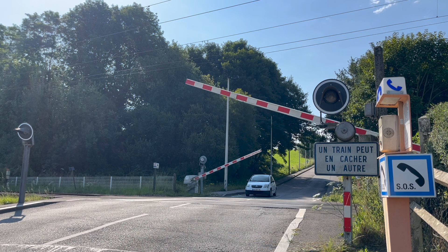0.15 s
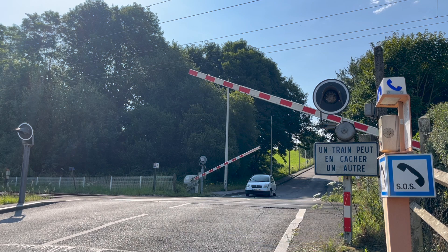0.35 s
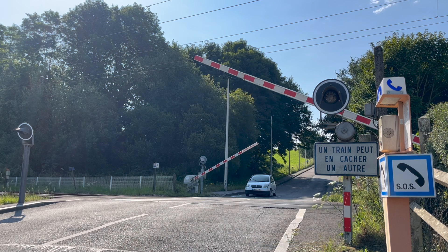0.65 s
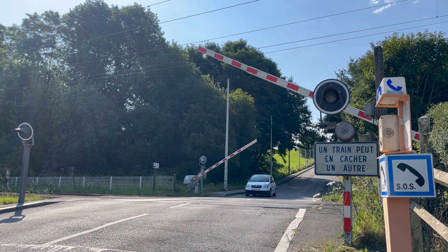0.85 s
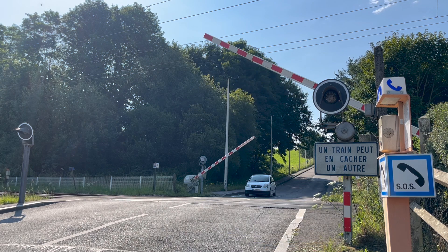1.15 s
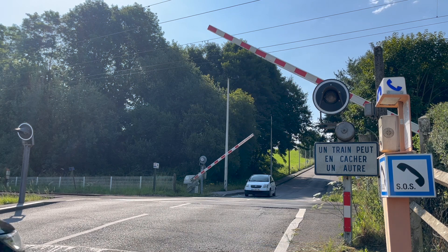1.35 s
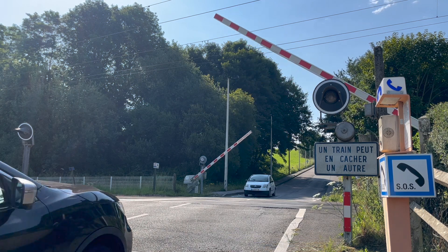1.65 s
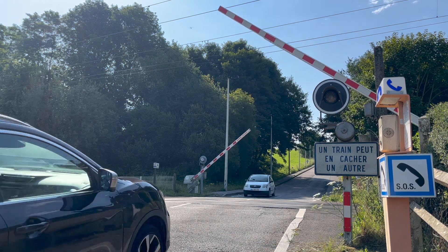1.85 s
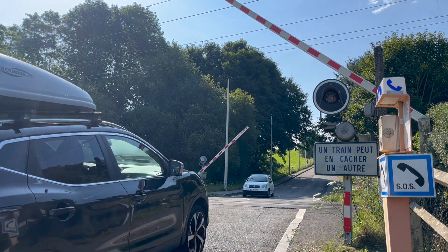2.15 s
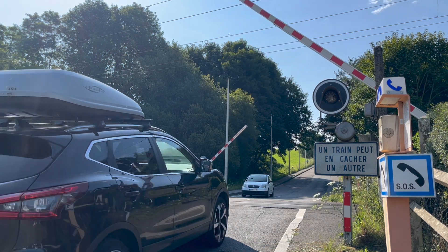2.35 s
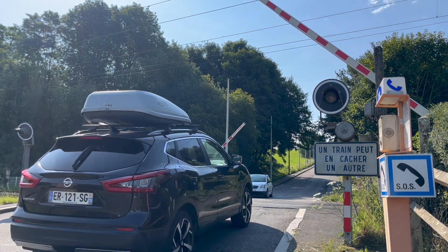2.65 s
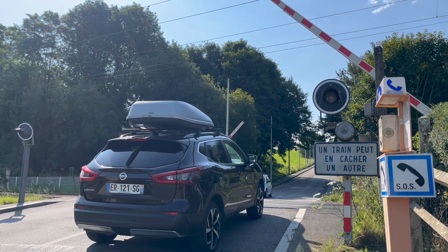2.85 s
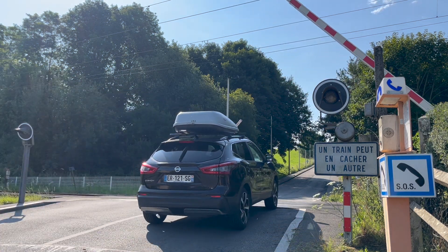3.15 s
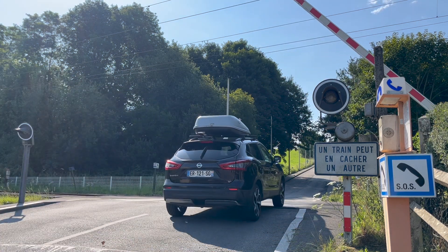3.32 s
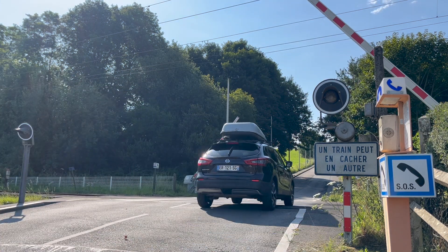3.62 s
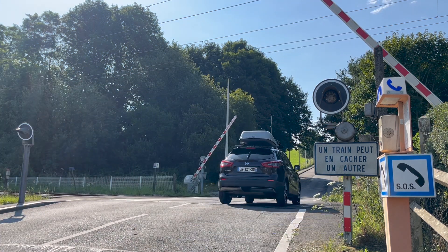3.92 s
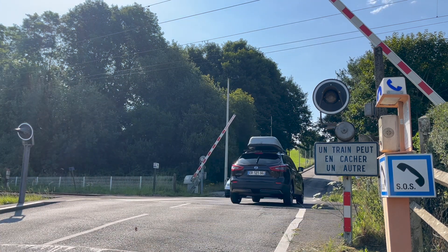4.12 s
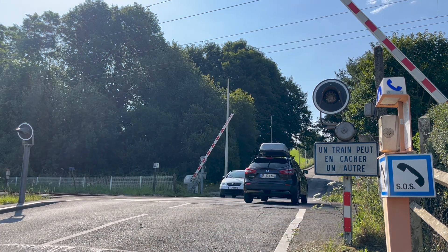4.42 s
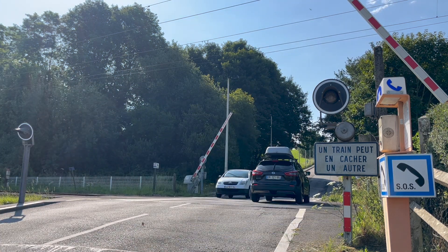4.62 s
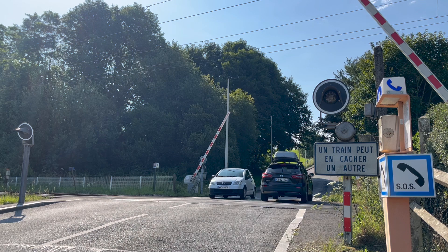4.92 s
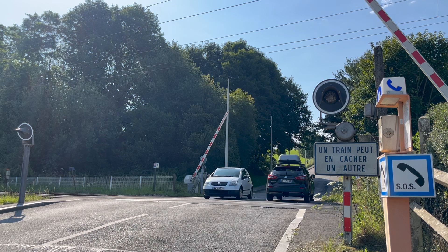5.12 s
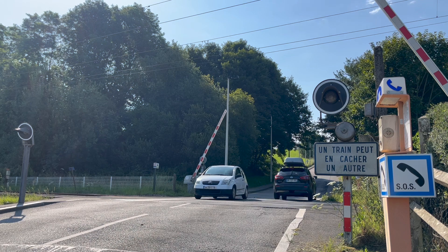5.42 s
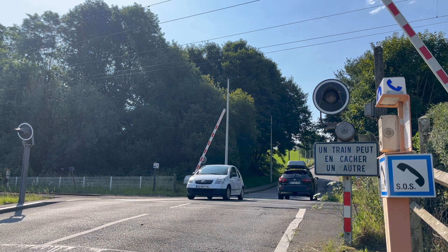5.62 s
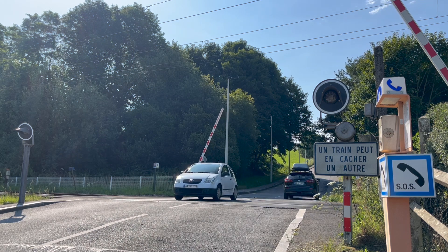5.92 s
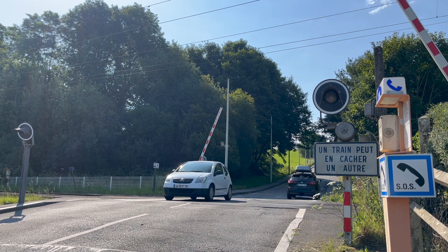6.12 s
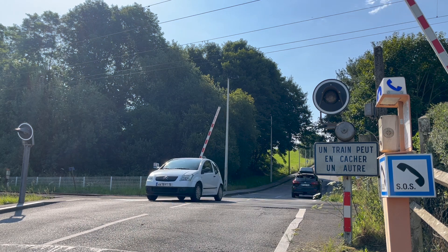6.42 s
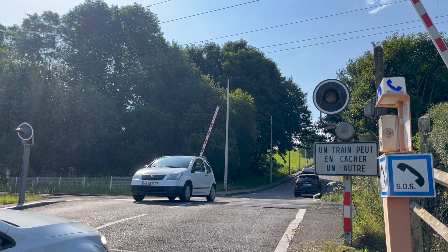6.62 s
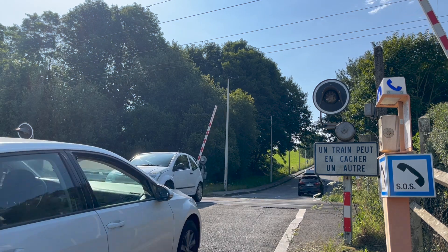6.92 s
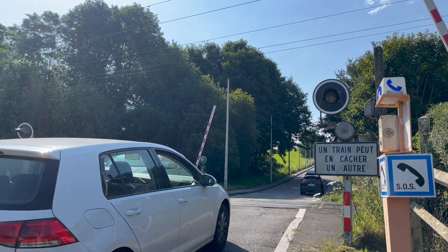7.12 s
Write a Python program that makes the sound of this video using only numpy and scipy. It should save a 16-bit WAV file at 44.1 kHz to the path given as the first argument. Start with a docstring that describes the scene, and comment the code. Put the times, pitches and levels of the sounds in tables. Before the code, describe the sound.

Heard in stereo from the roadside: a low, throbbing engine gathers speed, raspy under load, then eases off as the car crosses the rails with dull bumps and short clacks. More thuds follow while a weak oncoming drone lingers. A second car swells from the left, smoother in engine but fuller in tyre noise, its close passage shaking with strong bass thumps and rattling knocks. Faint leaves and distant traffic lie underneath.

```python
"""A car pulls away on the left from a crawl, passes close by on its exhaust hum and thumps over crossing rails.
A second car rolls up from the left while an oncoming one drones nearer; loose panels knock, grit snaps.
Exhausts are tones locked to the firings; engine bays, tyres and rumble are coloured noise; thuds are swings.
Heard from the verge of a country level crossing through a small pair of microphones."""
import sys
import numpy as np
from scipy import signal
from scipy.fft import rfft, irfft, next_fast_len
from scipy.io import wavfile
from scipy.ndimage import map_coordinates

SR = 44100
rng = np.random.default_rng(int(sys.argv[2]) if len(sys.argv) > 2 else 0)


def bounce(signal):
    """Save signal as a 16-bit WAV file at the path given by the first command-line argument."""
    frames = np.transpose(np.atleast_2d(signal))
    limited = np.clip(frames, -1, 1)
    pcm = np.round(limited * 32767).astype(np.int16)
    wavfile.write(sys.argv[1], SR, pcm)


N = 320166


def from_db(db):
    """Amplitude for a level in dB."""
    return np.exp(np.asarray(db) * (np.log(10) / 20))


def rms_one(x):
    """Scales x to rms 1."""
    return x / np.sqrt(np.mean(x ** 2) + 1e-20)


def seconds():
    """The time of every sample."""
    return np.arange(N) / SR


def in_time(rows):
    """The columns of a curve at every sample."""
    s, *columns = np.transpose(rows)
    return [np.interp(seconds(), s, c) for c in columns]


def within(rows, fade_s=0.24):
    """One while a curve lasts, fading out beyond its ends."""
    first_s, last_s = rows[0][0], rows[-1][0]
    return np.interp(seconds(), [first_s - fade_s, first_s, last_s, last_s + fade_s], [0, 1, 1, 0])


def at_hz(points, hz):
    """The columns of a spectrum at the given frequencies."""
    f, *columns = np.transpose(points)
    return [np.interp(np.log(hz + 1e-3), np.log(f), c) for c in columns]


def coloured(x, spectrum):
    """Gives x the spectrum, with rms 1."""
    size = next_fast_len(N)
    level_db, = at_hz(spectrum, np.arange(size // 2 + 1) * SR / size)
    return rms_one(irfft(rfft(x, size) * from_db(level_db), size)[:N])


def butter(x, hz, kind, order=2):
    """Butterworth filter."""
    return signal.sosfilt(signal.butter(order, hz, kind, fs=SR, output="sos"), x)


def drift(rate):
    """A smooth random wander of rms 1, with two random points for each cycle of the rate (Hz)."""
    knots = rng.standard_normal(int(N / SR * 400) + 4)
    places = np.arange(0, N, 32) / SR * min(2 * rate, 400)
    wander = rms_one(map_coordinates(knots, [places], order=2, mode="mirror"))
    return wander.repeat(32)[:N]


def bell(x, centre, width):
    """One at the centre, falling away on both sides."""
    return np.exp(-((x - centre) / width) ** 2)


def resonance(noises, hz, width_hz):
    """Two noises sound through a band whose centre may glide; rms 1."""
    angle = 2 * np.pi * np.cumsum(hz + np.zeros(N)) / SR
    return rms_one(np.sum(butter(noises, width_hz / 2, "low") * [np.cos(angle), np.sin(angle)], axis=0))


def add(track, s, sound):
    """Mixes a short sound in at time s."""
    start = max(int(s * SR), 0)
    track[start:start + len(sound)] += sound[:N - start]


def drive(abreast_s, lane_m, speed, accel, top_speed):
    """A car gathers speed (m/s, m/s2): metres past the listener, metres to the side, speed against abreast."""
    now = np.clip(speed + accel * (seconds() - abreast_s), .5, top_speed)
    start_m = -speed * abreast_s + accel * abreast_s ** 2 / 2
    return start_m + np.cumsum(now) / SR, lane_m, now / speed


def spreading_db(along_m, lane_m):
    """Loss with distance, against the closest point."""
    return -20 * np.log10(np.hypot(along_m, lane_m) / lane_m)


def ahead(path):
    """Minus one far before the listener, zero abreast, one far beyond."""
    along_m, lane_m, _ = path
    return along_m / np.hypot(along_m, lane_m)


def bearing_of(path):
    """How far left of the microphones' aim a car is (rad)."""
    along_m, lane_m, _ = path
    aim_rad = 0.374   # left of the road ahead
    rear_rad = 1.643   # beyond this bearing the pair hears no further change
    return np.minimum(np.arctan2(lane_m, along_m) - aim_rad, rear_rad)


def scattered(hz, frames):
    """A short diffuse tail, unrelated left and right, its share set for each frequency."""
    # tail against the direct sound: f/Hz, level/dB
    tail_share = [(40, -10), (130, -22.5), (280, -10), (550, -6), (1200, -3.5), (1600, 0.5), (1950, -8),
                  (2800, -6), (4500, -6), (7000, 6.5), (8300, -60), (10000, 30), (11300, -23), (12500, -11),
                  (13600, -19)]
    t60_s = 0.13
    keep = from_db(-120 * 256 / SR / t60_s)   # power kept from one frame to the next
    tail = np.sqrt(signal.lfilter([1 - keep], [1, -keep], np.abs(frames) ** 2))
    wet = from_db(at_hz(tail_share, hz)[0])[:, None]
    random_phase = np.exp(2j * np.pi * rng.random((2, *frames.shape)))
    return wet, np.sqrt(2) * wet * tail * random_phase


def microphones(x, bearing, treble_db=0):
    """Left and right differ in phase and level: by bearing in bass and middle, by set phases in the treble."""
    # left against right: f/Hz, phase lead for each rad of bearing, set phase lead/rad,
    # level/dB straight ahead, level/dB for a source on the left
    pair = [(20, 0, 0, 0, 0), (110, .12, .04, .5, .3), (250, .38, .15, 1.5, .8), (500, 1.0, .05, 1, 1.5),
            (800, 1.35, .15, 0, 3.5), (1100, 1.55, .1, -.5, 2.5), (1400, 1.9, .15, 0, -1),
            (1650, 2.0, -.3, 1, -1), (1850, .5, .1, 0, .8), (2500, .3, .45, .5, 3), (3500, .7, .6, 3, 4.5),
            (4600, .3, .7, 5, 4.5), (5600, 0, -.75, 1.5, 4), (6400, .3, -1.25, 0, 4),
            (7200, .3, -2.2, 0, 1), (7900, 0, -3, 0, 0), (9000, 0, -3.3, 0, 0), (10000, 0, -4.7, 0, 0),
            (11000, 0, -6.2, 0, 0), (12800, 0, -6.35, 0, 0), (13500, 0, -7.2, 0, 0), (14400, 0, -9.3, 0, 0)]
    # a car's body shading its own sound: f/Hz, share of treble_db
    shadow = [(1900, 0), (2600, 1.15), (4000, 1.0), (5800, 0.5), (7200, 1.86), (10000, 2), (14000, 2.5)]
    hz, s, frames = signal.stft(x, SR, nperseg=512)

    def per_frame(curve):
        return np.interp(s, seconds(), curve + np.zeros(N))

    lead, set_lead, front_db, left_db = (c[:, None] for c in at_hz(pair, hz))
    balance_db = front_db + (left_db - front_db) * np.sin(per_frame(bearing))
    phase = lead * per_frame(bearing) + set_lead
    frames = frames * from_db(at_hz(shadow, hz)[0][:, None] * per_frame(treble_db))
    left = frames * from_db(balance_db / 2)
    right = frames * from_db(-balance_db / 2) * np.exp(-1j * phase)
    # the balance leaves the summed power alone
    direct = np.array([left, right]) / np.sqrt(np.cosh(balance_db * np.log(10) / 20))
    wet, diffuse = scattered(hz, frames)
    return signal.istft((direct + diffuse) / np.sqrt(1 + wet ** 2), SR)[1][:, :N]


def open_air():
    """Far traffic and leaves: steady coloured noise, independent at each microphone."""
    # f/Hz, relative density level/dB per Hz
    colour = [(40, 0), (200, -18), (500, -35), (1000, 17), (2500, -1), (6000, -15), (14000, -133)]
    return from_db(-58.5) * np.array([coloured(noise, colour) for noise in rng.standard_normal((2, N))])


def rumble(rolling, rolling_db, lumpy_db):
    """Tyre carcasses shake as they roll, and harder over each uneven stretch."""
    # uneven stretches: middle t/s, length/s, level/dB
    stretches = [(2.85, 0.95, -41), (3.376, 0.42, -34), (4.103, 0.7, -34), (4.595, 0.23, -31.5),
                 (5.34, 0.77, -38), (6.47, 0.47, -30)]
    # f/Hz, relative density level/dB per Hz
    colour = [(20, -63), (32, -11), (45, -3), (60, 6), (80, 1), (110, -2), (160, -6.5), (230, -12.5),
              (320, -18.5), (600, -74)]
    swells = sum(from_db(db) ** 2 * bell(seconds(), s, length_s / 2) for s, length_s, db in stretches)
    level = np.sqrt((from_db(rolling_db) * rolling) ** 2 + swells)
    shaking = coloured(rng.standard_normal(N), colour) * from_db(lumpy_db * drift(14))
    return level * rms_one(shaking)


def thumps(rise_cycles, gain_db):
    """A tyre squashes over an edge and swings for two or three cycles; the air inside it rings."""
    # wheels dropping on rails and panels: t/s, level/dB before gain_db, f/Hz
    drops = [(2.895, -15.5, 76), (3.248, -23, 76), (3.755, -16, 60.2), (4.032, -21.5, 70.5),
             (4.578, -20, 87), (4.639, -18, 60.7), (4.671, -18.5, 65), (4.814, -17.5, 62), (5.005, -21, 55),
             (5.151, -17, 62.6), (5.293, -13, 72.6), (5.487, -14.5, 97), (5.564, -16.5, 93),
             (5.668, -12.5, 76), (6.298, -21, 87), (6.357, -15, 71.4), (6.395, -11.5, 69.5),
             (6.433, -11.5, 73), (6.497, -17, 100), (6.620, -9, 71), (6.725, -8, 65), (7.007, -15, 53.6),
             (7.091, -18, 92)]
    cavity_hz, cavity_t60_s, cavity_db = 191, 0.041, -12.5   # middle pitch; level against the thump
    out, t = np.zeros(N), np.arange(SR // 8) / SR
    for s, db, hz in drops:
        age = t * hz / rise_cycles
        swing = -(age * np.exp(1 - age)) ** 3 * np.sin(2 * np.pi * hz * t)
        ring_hz = cavity_hz * rng.uniform(0.74, 1.21)
        cavity = from_db(cavity_db - 60 * t / cavity_t60_s) * np.sin(2 * np.pi * ring_hz * t)
        add(out, s, from_db(db + gain_db) * swing)
        add(out, s + .5 / hz, from_db(db + gain_db) * cavity)   # half a swing later
    return out


def knocks():
    """A loose panel rings briefly together with a broad crack."""
    # t/s, level/dB, f/Hz, t60/s, crack against the ring (0-1)
    blows = [(1.947, -32, 264, .053, .7), (3.360, -32, 500, .11, .4), (3.388, -34, 400, .08, .7),
             (3.417, -36, 350, .07, .8), (3.652, -32, 363, .07, .6), (3.722, -33, 290, .06, .4),
             (3.872, -33, 520, .04, .9), (3.899, -38, 480, .06, .8), (3.972, -32, 260, .06, .4),
             (4.099, -36, 340, .07, .6), (4.169, -30.5, 420, .07, .45), (4.588, -31, 700, .045, .7),
             (4.895, -35, 363, .07, .8), (6.19, -30, 440, .06, .8), (6.394, -22, 235, .07, .5),
             (6.513, -26, 330, .07, .7), (6.664, -26, 250, .07, .5), (6.981, -25, 1100, .04, 1),
             (6.986, -27, 400, .05, .8), (7.098, -28, 310, .07, .5), (7.116, -26, 300, .06, .3)]
    out, t = np.zeros(N), np.arange(SR // 4) / SR
    for s, db, hz, t60, crack in blows:
        slap = butter(rng.standard_normal(len(t)), [hz / 2, hz * 2], "band", order=1)
        slap = rms_one(butter(slap, hz * 2, "low"))
        add(out, s, from_db(db - 60 * t / t60) * (np.sin(2 * np.pi * hz * t) + crack * slap))
    return out


def grit(t60):
    """Small stones snap out from under a tread: short decaying bursts of noise."""
    # t/s, level/dB
    stones = [(3.873, -43), (3.8986, -44), (4.0961, -48), (4.219, -47), (4.588, -37.5), (4.6134, -40),
              (6.8867, -43), (7.118, -43)]
    out, t = np.zeros(N), np.arange(SR // 10) / SR
    for s, db in stones:
        snap = butter(rng.standard_normal(len(t)), [1500, 5500], "band", order=1)
        snap = rms_one(butter(snap, 4600, "low"))
        add(out, s, from_db(db - 60 * t / t60) * snap)
    return out


def whine(flutter_db, wobble):
    """Meshing gears sing briefly under load, bending in pitch."""
    # one curve for each spell, pitch and level wavering about it: t/s, f/Hz, level/dB
    spells = [
        [(1.62, 494, -52), (1.85, 516, -44), (2.1, 522, -46)],
        [(2.5, 2670, -58), (2.9, 2860, -61)],
        [(2.95, 761, -55), (3.07, 775, -52), (3.22, 757, -47.5), (3.36, 775, -59), (3.47, 780, -51),
         (3.65, 771, -56), (3.8, 769.5, -59)],
        [(4.7, 547.3, -55), (4.9, 543, -51), (5.2, 552, -56)],
        [(6.2, 650.4, -46), (6.4, 660, -41), (6.7, 666, -64)],
    ]
    out = np.zeros(N)
    for curve in spells:
        hz, db = in_time(curve)
        pitch = hz * (1 + wobble * drift(25))
        level = from_db(db + flutter_db * drift(8.3))
        out += level * np.sin(2 * np.pi * np.cumsum(pitch) / SR) * within(curve, fade_s=0.086)
    return np.sqrt(2) * out


def roar_swells(lumpy_db):
    """The roar or hiss of a car swells in one band as it goes by."""
    # middle t/s, length/s, centre f/Hz, width/octaves, level/dB
    bands = [(0.453, 0.73, 215, 0.44, -47), (.55, .8, 950, 0.86, -48.5), (.5, 1.2, 5870, 0.4, -56.5),
             (.95, 0.47, 2882, .2, -56), (1.024, 0.41, 674, 0.79, -39.5), (1.2, 1.2, 11500, 0.39, -52.5),
             (1.497, 0.7, 980, 0.55, -47), (1.825, 0.16, 630, 0.76, -44.5), (2.3, 4.9, 11300, 0.16, -66),
             (2.701, 0.41, 1650, .4, -49), (2.866, 0.07, 745, 1.1, -43), (3.0, 1.1, 3000, 1.0, -53.5),
             (3.47, 0.32, 9500, .8, -60), (3.9, 0.19, 9020, 1.0, -65), (4.852, 1, 2000, 0.34, -54),
             (5.7, 1.2, 1875, .22, -50), (4.904, 0.74, 726, 0.78, -49), (5.364, 0.97, 3750, 1.03, -53.5),
             (5.7, 1.2, 834, 0.74, -44), (5.8, 1.3, 12200, .4, -73), (6.398, 0.7, 766, 0.93, -40),
             (6.85, 1.1, 1960, 0.4, -47.5), (7.053, 0.64, 1050, .35, -46), (7.05, 0.66, 278, 0.95, -41)]
    out = np.zeros(N)
    for s, length_s, hz, octaves, db in bands:
        edges = np.minimum(hz * 2 ** (np.array([-.5, .5]) * octaves), .45 * SR)
        level = from_db(db + lumpy_db * drift(18)) * bell(seconds(), s, length_s / 2)
        out += level * rms_one(butter(rng.standard_normal(N), edges, "band"))
    return out


def firings(engine):
    """Running count of firings; the crank never turns quite evenly."""
    return np.cumsum(in_time(engine)[0] * (1 + 0.00807 * drift(15))) / SR


def exhaust(engine, path, turns, orders, tone_db, octave_db, lines_db, rough_db, boom_db=0, pipe_db=0):
    """Firing pulses: two low tones that follow the throttle, and weaker lines that flutter in the pipe."""
    boom_hz, boom_width_hz = 51.45, 5.2   # the silencer
    pipe_hz, pipe_width_hz = 150, 59
    muffle_db_per_octave = 7   # damps the weaker lines as the revs rise
    uneven_db = 0.8   # spread of the two low tones' strength
    tailpipe_m = 1.96   # behind the middle of the car
    hz, throttle_db = in_time(engine)
    along_m, lane_m, _ = path
    angle = 2 * np.pi * turns
    tone = from_db(tone_db + boom_db * bell(hz, boom_hz, boom_width_hz)) * np.cos(angle)
    low_tones = tone - from_db(octave_db) * np.sin(2 * angle)
    lines = np.zeros(N)
    for k, db in orders:
        swell_db = pipe_db * bell(k * hz, pipe_hz, pipe_width_hz)
        level = from_db(db + swell_db + rough_db * drift(5.5))
        lines += level * np.cos(round(2 * k) / 2 * angle + rng.uniform(0, 2 * np.pi))
    lines_gain = from_db(lines_db - muffle_db_per_octave * np.log2(hz / boom_hz))
    pulses = from_db(throttle_db + uneven_db * drift(25)) * low_tones + lines_gain * lines
    distance_gain = from_db(spreading_db(along_m - tailpipe_m, lane_m))
    return -np.sqrt(2) * pulses * distance_gain * within(engine)


def oncoming_car():
    """Only the drone of its exhaust carries from the far side."""
    # engine: t/s, firing rate f/Hz, throttle level/dB
    engine = [(3.8, 47.73, -5), (4.4, 50.05, 1), (5.4, 48.55, 6), (6.0, 49.43, -2), (7.26, 48.13, 6.5)]
    # weaker exhaust lines: multiple of the firing rate, level/dB
    orders = [(3, -2), (4, -3.5)]
    path = drive(abreast_s=9.5, lane_m=6.05, speed=6.3, accel=0.8, top_speed=8.0)
    return exhaust(engine, path, firings(engine), orders,
                   tone_db=-30.5, octave_db=-41, lines_db=-38.0, rough_db=5.0)


def engine_bay(turns, colour, clatter_db, burst_share):
    """Each firing rings the block with a burst of its own strength, over the steady rush of belts and fan."""
    strength = from_db(1.3 * rng.standard_normal(1000)[turns.astype(int)])
    bursts = rng.standard_normal((2, N)) * strength * np.exp(-(turns % 1) / burst_share)
    rush = rms_one(butter(coloured(rng.standard_normal(N), colour), 135, "high", order=3))
    return rush + from_db(clatter_db) * resonance(bursts, hz=1865, width_hz=250)


def bay_gain(engine, path, level_db, throttle_share, grille_db):
    """The engine bay gains with throttle and nearness, and shifts in level as its grille turns by."""
    bonnet_m, flank_m = 0.39, 0.43   # engine bay: ahead of the car's middle, and toward the listener
    _, throttle_db = in_time(engine)
    along_m, lane_m, _ = path
    near_db = spreading_db(along_m + bonnet_m, lane_m - flank_m)
    return from_db(level_db + throttle_share * throttle_db + near_db - grille_db * ahead(path)) * within(engine)


def tyres(colour, grain_db, patchy_db, crackle_db):
    """Tread blocks slap the asphalt in dense tiny impacts, swelling on rough patches; sand crackles."""
    impacts = rng.standard_normal(N) * from_db(grain_db * drift(170) + patchy_db * drift(12))
    roar = rms_one(butter(coloured(impacts, colour), 152, "high", order=3))
    struck = rng.random(N) < 200 * from_db(5 * drift(7)) / SR   # about 200 grains a second, wandering
    grains = struck * np.minimum(rng.exponential(1, N), 2)
    decay = np.exp(-1 / (0.0026 * SR))
    snaps = signal.lfilter([1], [1, -decay], grains + 1e-18) * rng.standard_normal(N)
    return roar + from_db(crackle_db) * rms_one(butter(snaps, [7000, 12000], "band"))


def tyre_gain(path, level_db, horn_db):
    """Tyres gain with speed and nearness; the wedge between tread and road beams them along the road."""
    along_m, lane_m, pace = path
    speed_db = 7.5 * np.log2(pace)   # dB for each doubling of speed
    return from_db(level_db + speed_db + spreading_db(along_m, lane_m) + horn_db * ahead(path) ** 2)


def hedge_echo(x, bearing, delay_s, sweep_s, echo_db):
    """The hedge returns a copy whose delay changes as the car moves: faint resonances glide in the roar."""
    late = np.interp(seconds() - delay_s - sweep_s * bearing, seconds(), x)
    return (x + from_db(echo_db) * late) / np.sqrt(1 + from_db(echo_db) ** 2)


def car(path, hum, roar, bright_db, bared_db, dulling):
    """Exhaust and roar travel together; the treble shifts as the body goes by and with distance."""
    along_m, lane_m, _ = path
    bearing = bearing_of(path)
    treble_db = bright_db + bared_db * ahead(path) + dulling * spreading_db(along_m, lane_m)
    echoed = hedge_echo(roar, np.sin(bearing), delay_s=.006, sweep_s=.004, echo_db=-15.5)
    return microphones(hum + echoed, bearing, treble_db)


def second_car(path):
    """Comes up from the left, already rolling; returns its sound and the gain of its tyres."""
    # engine: t/s, firing rate f/Hz, throttle level/dB
    engine = [(4.6, 58.73, -3.5), (5.9, 60.4, -5.5), (6.25, 60.9, -1), (6.85, 61.88, 1), (7.26, 63.1, -4.5)]
    # weaker exhaust lines: multiple of the firing rate, level/dB
    orders = [(2.5, -12), (3, -26.5), (4, -15.5), (5, -19)]
    # engine bay and tyre colours: f/Hz, relative density level/dB per Hz
    bay_colour = [(200, -11.5), (330, -10.5), (520, -6.5), (800, -9.5), (1250, -11), (1850, -22),
                  (2400, -23), (3500, -21.5), (4600, -41), (6200, -28.5), (8500, -30.5), (11000, -27.5),
                  (12500, -26), (14500, -25.5)]
    tyre_colour = [(200, 0.5), (350, -4.5), (600, -1.5), (1000, -4), (1250, -12.5), (1550, -6.5),
                   (2000, -11), (2900, -11.5), (4200, -15.5), (6000, -24.5), (8000, -24), (11000, -30),
                   (12500, -76), (14500, -55)]
    turns = firings(engine)
    hum = exhaust(engine, path, turns, orders, tone_db=-34.0, octave_db=-43.5, lines_db=-39.5, rough_db=9.0)
    bay = bay_gain(engine, path, level_db=-34.5, throttle_share=0.81, grille_db=0.5)
    bay = bay * engine_bay(turns, bay_colour, clatter_db=-11.5, burst_share=0.25)
    rolling = tyre_gain(path, level_db=-36.5, horn_db=6.5) * within(engine, fade_s=1.0)
    tread = rolling * tyres(tyre_colour, grain_db=1.67, patchy_db=0.5, crackle_db=-45.0)
    return car(path, hum, bay + tread, bright_db=-3.0, bared_db=1.44, dulling=-0.015), rolling


def intake(engine, turns, throb):
    """Air roars into the engine in gulps, steeply louder as the throttle opens."""
    _, throttle_db = in_time(engine)
    gulps = rng.standard_normal(N) * (1 + throb * np.cos(2 * np.pi * turns))
    level_db = -16.5 + 3.1 * throttle_db   # against the engine bay
    return from_db(level_db) * rms_one(butter(gulps, [590, 1100], "band"))


def rasp(turns, throb):
    """Under load the engine rasps in a band that throbs with the firings and glides upward."""
    # one curve for each glide: t/s, centre f/Hz, level/dB before the throb
    glides = [
        [(.38, 1620, -48.5), (.75, 1679, -48.5), (1.03, 2020, -50.5), (1.22, 2400, -58)],
        [(1.25, 1790, -52), (1.55, 1770, -50), (1.82, 1900, -47.5), (2.02, 2250, -58), (2.25, 2580, -56)],
    ]
    out = np.zeros(N)
    for curve in glides:
        hz, db = in_time(curve)
        band = resonance(rng.standard_normal((2, N)), hz, width_hz=250)
        out += from_db(db) * band * within(curve, fade_s=0.11)
    return out * (1 + throb * np.cos(2 * np.pi * turns))


def first_car(path):
    """Pulls away from a crawl and eases off beyond the rails; returns its sound and the gain of its tyres."""
    # engine: t/s, firing rate f/Hz, throttle level/dB
    engine = [(0, 43.9, -1), (.11, 42.9, -3), (.19, 39.5, -3.5), (.3, 40.45, -6), (.41, 45.72, -1.5),
              (.9, 52.97, -0.8), (1.8, 55.7, -2.5), (2.25, 58.87, -2), (2.65, 64.5, 0), (3.06, 73.17, 1),
              (3.6, 74.83, -4), (4.3, 61.2, -7.5)]
    # weaker exhaust lines: multiple of the firing rate, level/dB
    orders = [(1.5, -8.5), (2.5, -24.5), (3, -11.5), (3.5, -24), (4, -11), (4.5, -25), (5, -23), (6, -20),
              (9, -25)]
    # engine bay and tyre colours: f/Hz, relative density level/dB per Hz
    bay_colour = [(200, -7), (330, -11), (520, -4), (800, -11), (1250, -10), (1850, -13), (2400, -30.5),
                  (3500, -23), (4600, -25.5), (6200, -20), (8500, -29), (11000, -29), (12500, -43.5),
                  (14500, -31.5)]
    tyre_colour = [(200, 0), (350, -4), (600, -10.5), (1000, -10), (1250, -14), (1550, -13), (2000, -14.5),
                   (2900, -19), (4200, -21.5), (6000, -33), (8000, -51), (11000, -34), (12500, -45),
                   (14500, -37)]
    turns = firings(engine)
    along_m, lane_m, _ = path
    hum = exhaust(engine, path, turns, orders, tone_db=-32.0, octave_db=-30.0, lines_db=-37.5,
                  rough_db=1.5, boom_db=8.5, pipe_db=8.5)
    bay = engine_bay(turns, bay_colour, clatter_db=-19, burst_share=0.18) + intake(engine, turns, throb=0.31)
    bay = bay * bay_gain(engine, path, level_db=-39.0, throttle_share=0.97, grille_db=-1.5)
    rolling = tyre_gain(path, level_db=-40.5, horn_db=3.5)
    sand_db = -22.5 + .25 * spreading_db(along_m, lane_m)   # against the tyres, fading faster with distance
    tread = rolling * tyres(tyre_colour, grain_db=0.5, patchy_db=0.82, crackle_db=sand_db)
    roar = bay + tread + rasp(turns, throb=0.58)
    return car(path, hum, roar, bright_db=2.0, bared_db=4.5, dulling=0.67), rolling


def scene():
    """Two passes, an oncoming car, the crossing under the wheels, and the open air."""
    first_path = drive(abreast_s=1.4, lane_m=4.14, speed=3.74, accel=1.53, top_speed=6)
    second_path = drive(abreast_s=6.54, lane_m=2.75, speed=5.85, accel=0.067, top_speed=7.5)
    first, first_rolling = first_car(first_path)
    second, second_rolling = second_car(second_path)
    thuds = butter(thumps(rise_cycles=0.75, gain_db=-3.5), 37, "high")
    # the first car, being slow, shakes the road less
    rolling = np.hypot(from_db(-7.5) * first_rolling, second_rolling)
    shaking = rumble(rolling, rolling_db=3.0, lumpy_db=2.0)
    clacks = knocks() + grit(t60=.04)
    gears = whine(flutter_db=4, wobble=0.011)
    # the swells come from whichever car has the louder tyres
    louder = np.where(first_rolling > second_rolling, bearing_of(first_path), bearing_of(second_path))
    swells = microphones(roar_swells(lumpy_db=1.4), louder)
    crossing = microphones(shaking + thuds + clacks + gears + oncoming_car(), bearing=.2)
    return first + second + swells + crossing + open_air()


def record(dry):
    """The deepest bass and the top are cut; the sound starts and stops without a click."""
    ends = np.interp(seconds(), [0, .003, N / SR - .006, N / SR], [0, 1, 1, 0])
    top_cut = signal.ellip(10, .2, 80, 14500, fs=SR, output="sos")
    return signal.sosfilt(top_cut, ends * butter(dry, 26, "high", order=3))


dry = scene()
out = record(dry)
bounce(out)
```